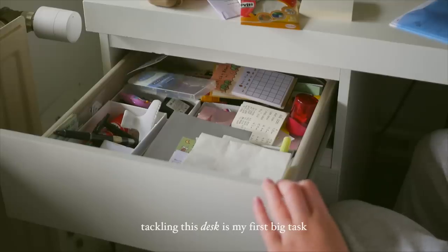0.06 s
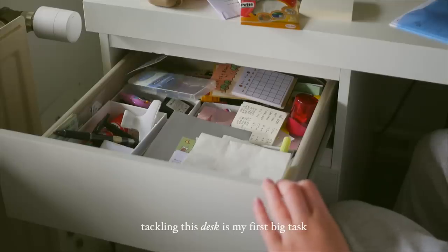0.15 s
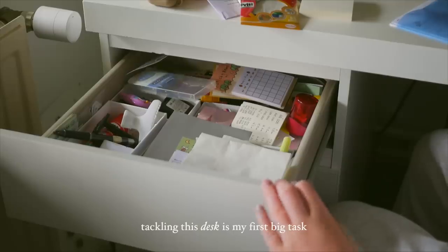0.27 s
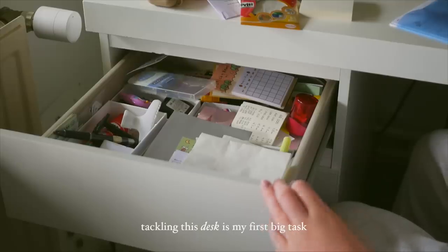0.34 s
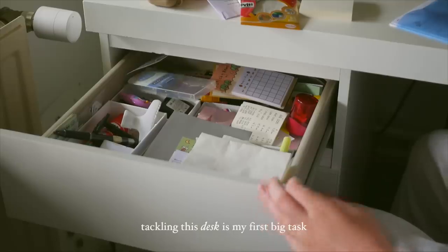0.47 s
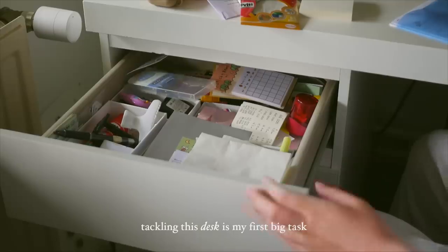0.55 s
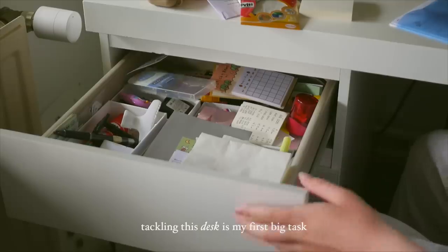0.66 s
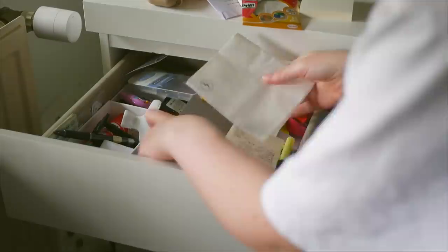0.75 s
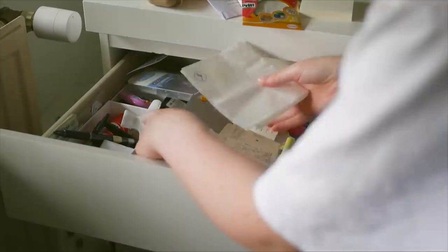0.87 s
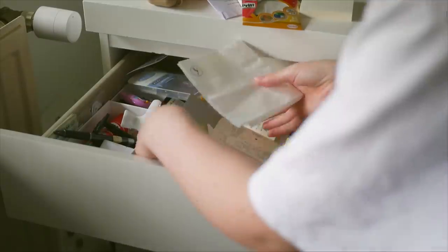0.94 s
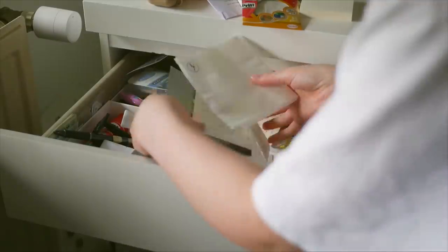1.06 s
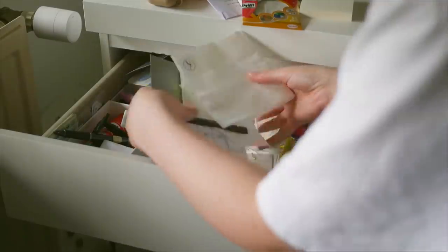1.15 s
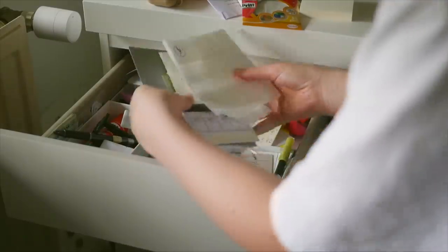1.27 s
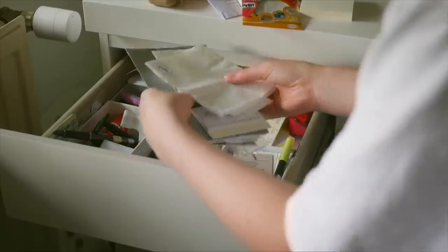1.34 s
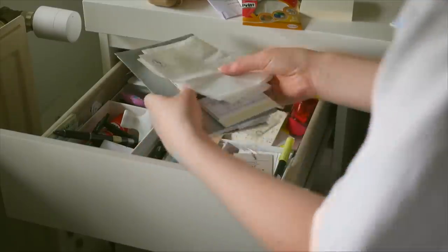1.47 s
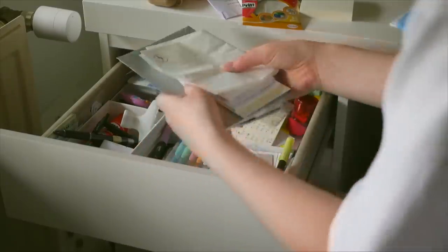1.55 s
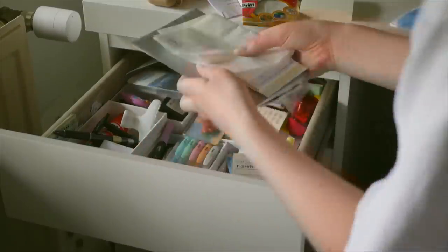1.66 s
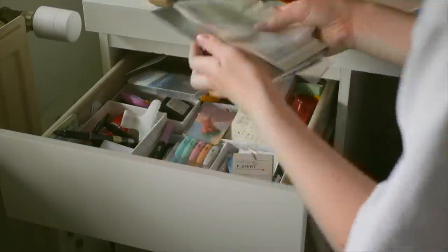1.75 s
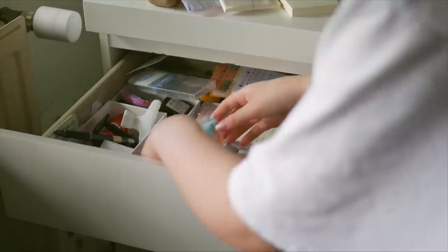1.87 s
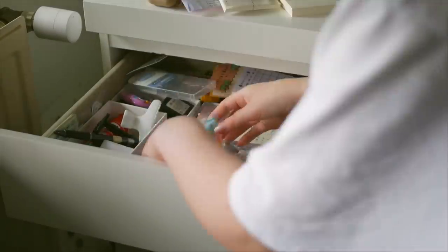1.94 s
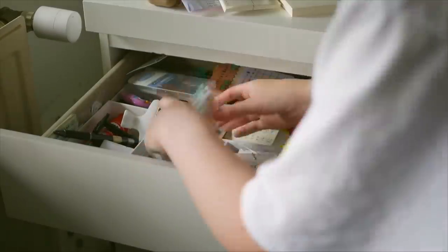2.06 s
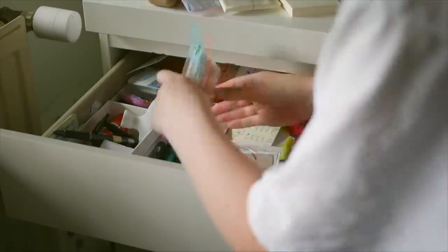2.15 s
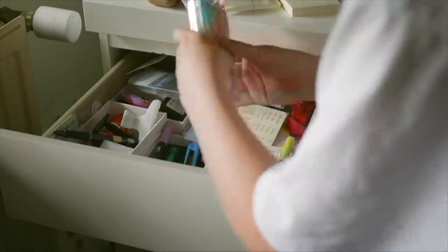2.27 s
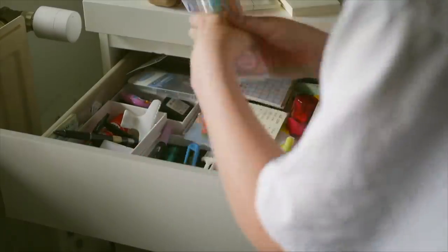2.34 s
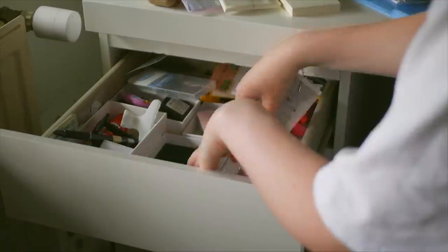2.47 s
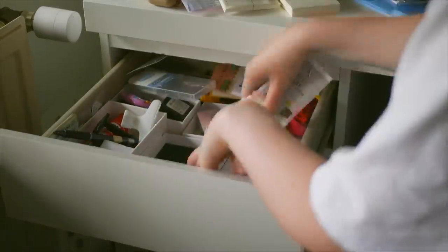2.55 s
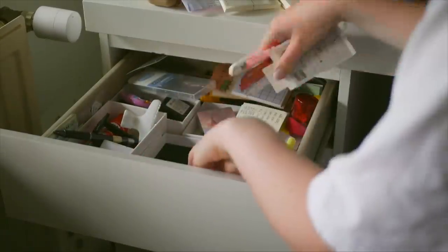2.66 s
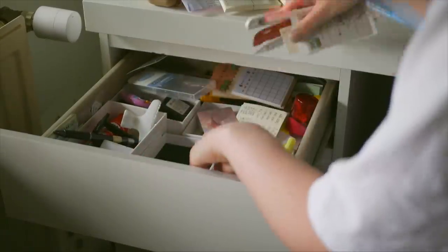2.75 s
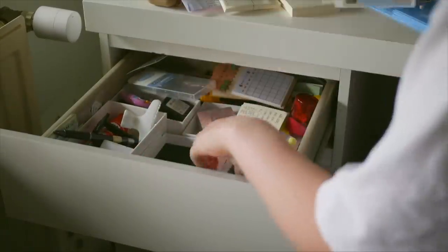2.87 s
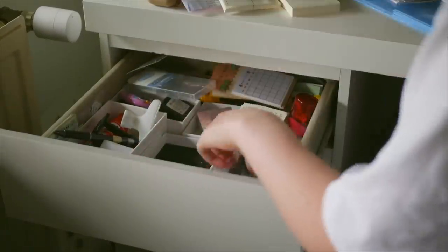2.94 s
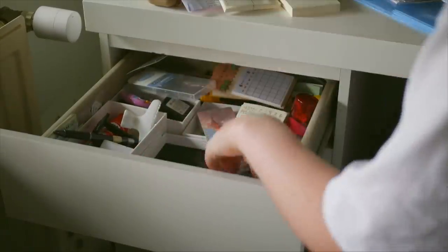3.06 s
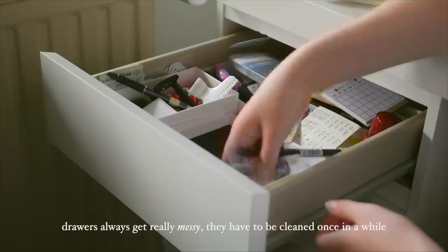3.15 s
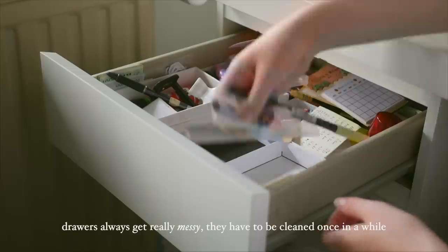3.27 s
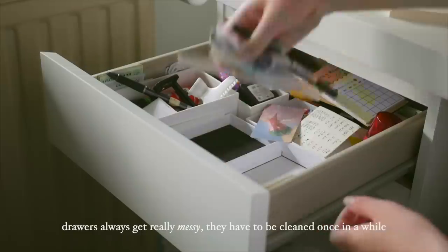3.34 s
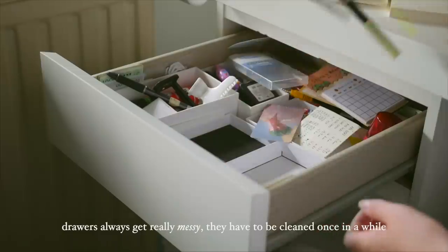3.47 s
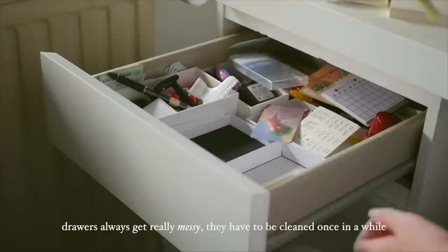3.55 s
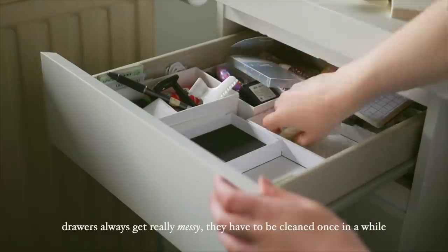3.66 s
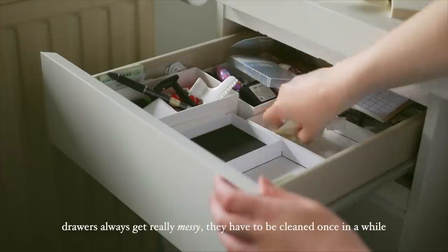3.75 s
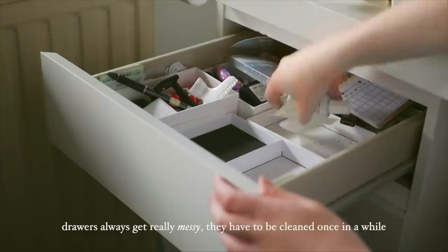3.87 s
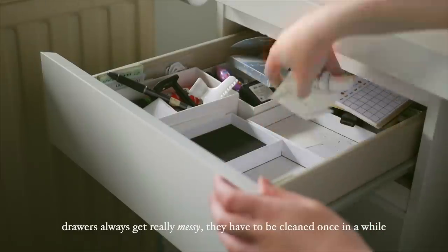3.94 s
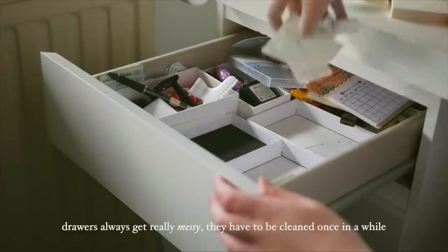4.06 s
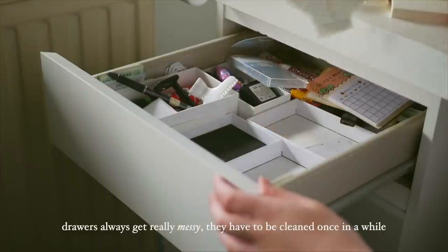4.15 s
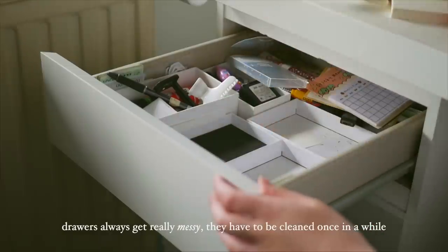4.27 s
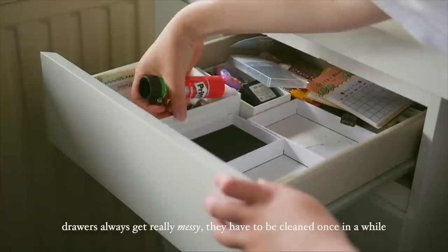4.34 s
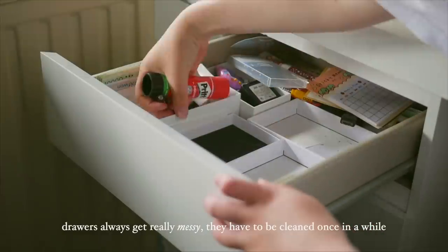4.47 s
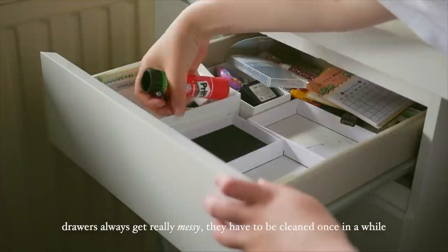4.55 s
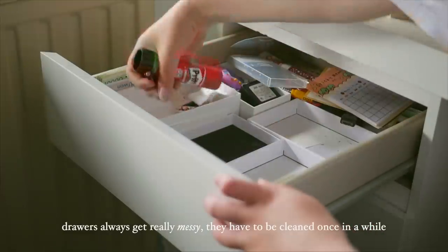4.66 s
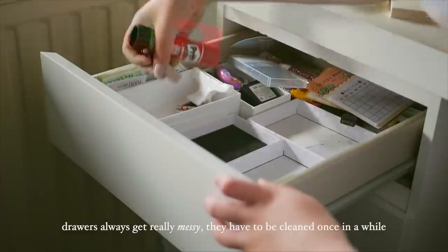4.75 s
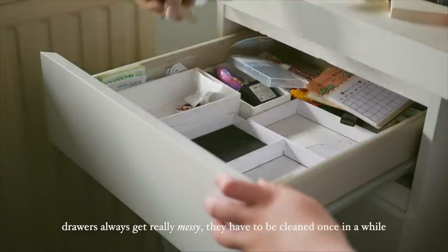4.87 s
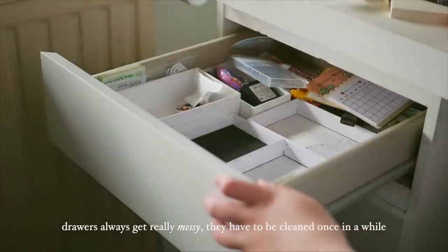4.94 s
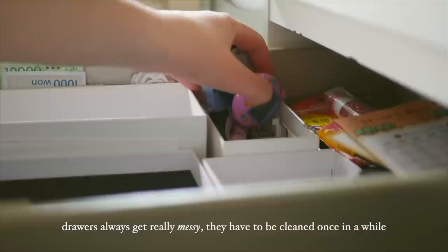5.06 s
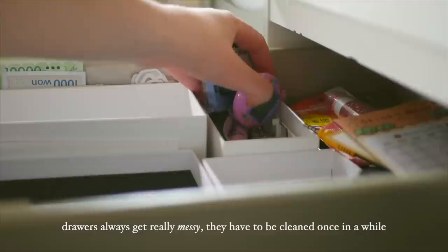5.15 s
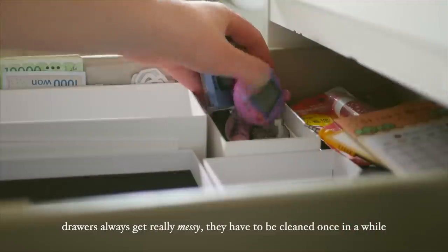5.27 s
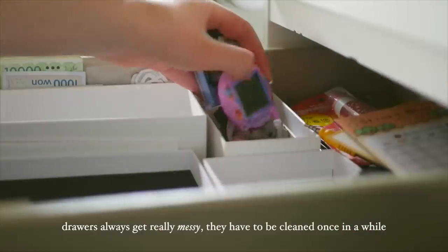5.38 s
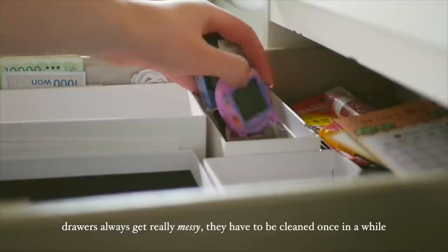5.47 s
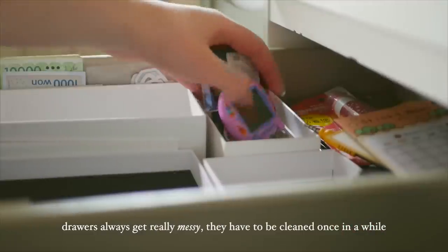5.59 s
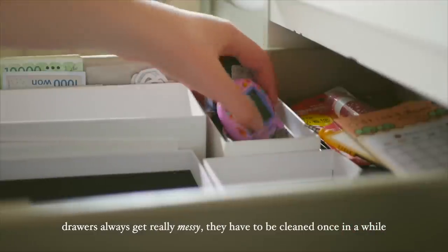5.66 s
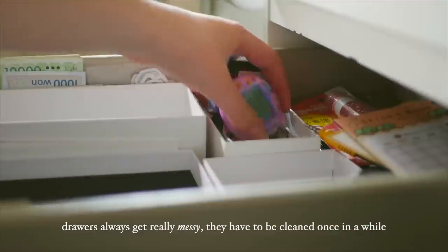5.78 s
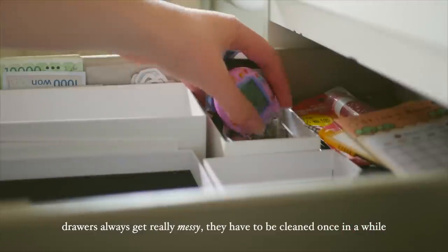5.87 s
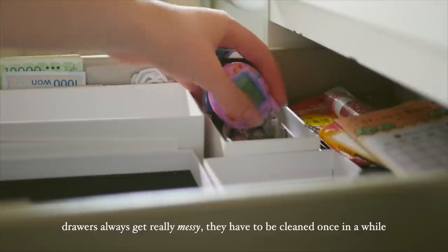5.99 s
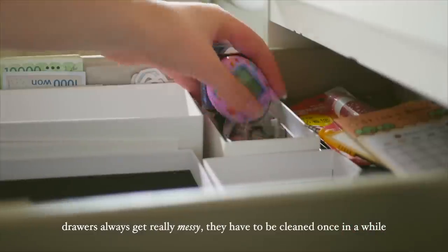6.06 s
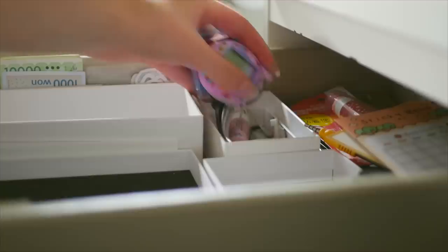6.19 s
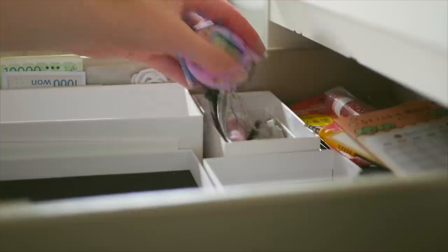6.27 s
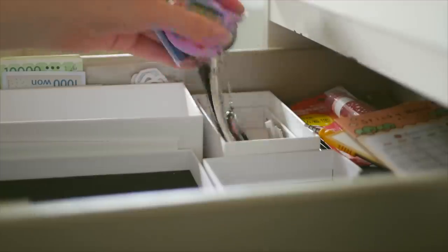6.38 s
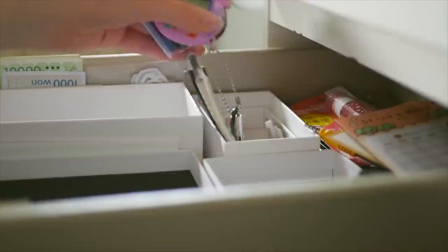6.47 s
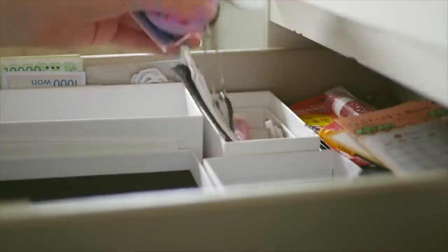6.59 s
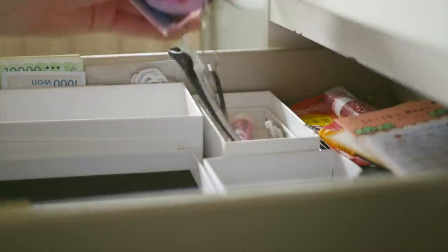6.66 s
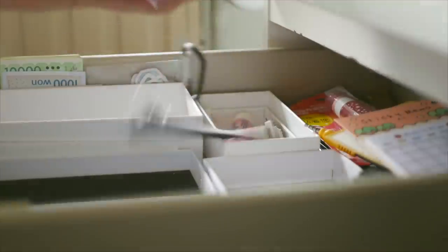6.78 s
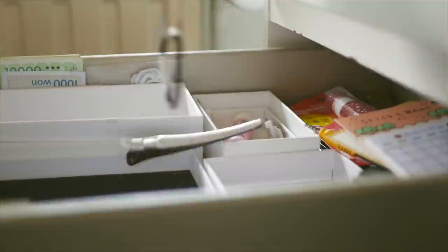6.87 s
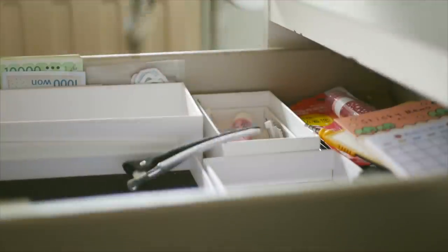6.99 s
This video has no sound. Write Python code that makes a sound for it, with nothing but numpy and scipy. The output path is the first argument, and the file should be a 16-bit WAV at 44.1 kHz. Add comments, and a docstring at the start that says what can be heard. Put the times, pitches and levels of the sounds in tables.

```python
"""Hands sort small things in a desk drawer in a small room, heard at first from a step away.
Faint rubbing opens; papers and sleeves rustle out, small cases are picked from cardboard trays, and at
4.4 s things land on the desk top. From 5 s, heard close, a toy is worked loose and a hair clasp drops.
Filtered noise bursts make the knocks, clumped slips the rubbing, decaying modes the jingles, bent tones
the snaps, driven resonances the scrapes; short tones jostle and a steady low noise is the room's air."""
import sys
import numpy as np
from scipy import signal
from scipy.fft import rfft, irfft, next_fast_len
from scipy.io import wavfile
from scipy.ndimage import uniform_filter1d

SR = 44100
rng = np.random.default_rng(int(sys.argv[2]) if len(sys.argv) > 2 else 0)


def put_to_file(sound):
    """Save the sound as 16-bit audio at rate SR, in the file named by the first command-line argument."""
    columns = np.atleast_2d(sound).T  # one column per channel
    safe = np.clip(columns, -1, 1)
    whole_steps = np.round(safe * 32767)
    wavfile.write(sys.argv[1], SR, whole_steps.astype(np.int16))


N = 309570  # length [samples]
CLOSE_S = 5  # from here on the listener is beside the drawer

# Knocks: papers and sleeves laid on the desk, cases picked from trays (2 s), things landing on the
# desk top (4.4 s), a plastic toy worked loose (5 s), a hair clasp dragged up, dangling, dropping (6.2 s):
# (time [s], contact, strength [dB], brightness [dB per octave], main resonance of the struck thing [Hz])
KNOCKS = [ (.741, "tick", -12.5, -2, 7210), (.818, "crackle", -11.5, -6.5, 1880),
          (1.034, "hollow", -13.5, 8, 1690), (1.115, "flap", -2.5, -0.5, 885),
          (1.612, "crackle", -8.5, 5, 4500), (1.698, "hollow", -5, 4, 1250), (1.7637, "clack", 5, 2, 2380),
          (1.822, "tap", 4, 4.5, 920), (1.8335, "chink", 3.5, 1, 5460), (1.841, "tick", 3.5, -1.5, 5450),
          (1.8864, "clack", 4, -0.5, 1350), (1.905, "thud", 4, 1, 243), (1.983, "hollow", 1.5, 3.5, 1420),
          (2.009, "tick", -4, -2.5, 630), (2.152, "thud", 6.5, -2, 256), (2.168, "chink", -9, -3, 8900),
          (2.178, "thud", 5.5, 0, 300), (2.276, "knock", 0, 0, 364), (2.359, "pop", -11, 6, 3080),
          (2.4224, "clack", -9, 1, 10800), (2.803, "pop", 0, 8, 3540), (2.853, "tap", 2.5, 1, 620),
          (3.1411, "tap", 1.5, 1, 563), (3.2165, "hollow", 7.5, 2, 1570), (3.272, "hollow", 0, -0.5, 840),
          (3.3682, "crackle", -9.5, 1.5, 10700), (3.702, "knock", -6, 2.5, 1380),
          (3.8038, "hollow", 1, -1.5, 1370), (3.8445, "snap", -5, -1.5, 1430),
          (4.2044, "knock", -13, 0.5, 530), (4.3812, "hollow", 17.5, 1.5, 890),
          (4.4, "bounce", 22, -0.5, 574), (4.409, "bounce", 9, 2.5, 900), (4.4463, "chink", 13, -2, 7700),
          (4.4545, "knock", 15, -0.5, 603), (4.4734, "bounce", 19, 2, 637), (4.5712, "snap", 0, -3.5, 2700),
          (4.5805, "crackle", -0.5, -1.5, 4140), (4.778, "knock", -5, 0, 264), (5.021, "tap", 2.5, 0, 764),
          (5.0312, "hollow", 8.5, -.5, 1050), (5.0448, "pop", 10, -1, 1750),
          (5.073, "hollow", 2.5, 0.5, 1230), (5.264, "thud", 9, -1.5, 215), (5.3056, "snap", 13, -1, 6800),
          (5.312, "clack", 6.5, -0.5, 3220), (5.3165, "hollow", 5.5, 0, 1220),
          (5.3729, "snap", -5, -1, 800), (5.39, "pop", -1, -1, 1880), (5.401, "snap", -4.5, 0.5, 2290),
          (5.4288, "pop", 5.5, -3.5, 1900), (5.4305, "bounce", 4.5, -2, 490), (5.464, "pop", 0.5, -3, 1900),
          (5.476, "clack", -5, -0.5, 5100), (5.484, "clack", 4, -3, 1030), (5.599, "bounce", 6, -3, 320),
          (5.651, "crackle", -8.5, -2.5, 2180), (5.73, "knock", 6, -1.6, 1350), (5.813, "pop", 3, -1, 2380),
          (5.8361, "snap", 8, -1.5, 6240), (5.84, "tick", 5.5, -1, 6070), (5.884, "snap", 6.5, -1.5, 6960),
          (5.8912, "snap", 6.5, -1, 544), (6.2214, "chink", -8, -0.5, 7040),
          (6.427, "clack", 6.5, -0.5, 3300), (6.429, "clack", 11, 0.5, 4230),
          (6.4635, "snap", 6, -1.5, 3280), (6.464, "tap", 12, 1, 584), (6.5714, "snap", 2.5, -2.5, 1950),
          (6.607, "snap", 1.5, -2.5, 1190), (6.6618, "snap", -2, -1, 2270), (6.794, "tap", 7.5, -1.5, 553),
          (6.8586, "thud", 27.5, -0.96, 296), (6.958, "thud", 7.5, -3, 730)]
# Centres of the bands in which a contact is coloured: (frequency [Hz])
KNOCK_BANDS_HZ = [240, 720, 2000, 4900, 10500]
# Kinds of contact. thud: something blunt on the drawer's bottom; tap: on a cardboard tray; hollow: a light
# case; knock: hard plastic on tray or desk; clack: plastic on plastic; bounce: a flat face slaps the desk;
# snap: an edge catches and lets go; pop: a small shell slips off an edge; tick: a thin hard edge;
# chink: small metal parts touch; crackle: a sleeve buckles or a thin edge slips; flap: a stiff card flexes.
# (level in each knock band [dB], ring t60 before the room draws it out or in [s],
#  lift of the main resonance [dB], extra room [dB], first push against the ring [ratio])
CONTACTS = { "thud": ((0.5, -14.5, -18.5, -29, -41.5), 0.043, 9.6, 0, 0.33),
            "tap": ((0, -0.5, -13.5, -19.5, -30), 0.057, 8.6, -0.76, 0.4),
            "hollow": ((-15.5, 0, -5, -21, -30.5), 0.052, 9.6, 0, 0.23),
            "knock": ((0, -1.5, -7.5, -10.5, -21.5), 0.045, 11.5, 0, 0.57),
            "clack": ((-7, -5, -1, -5, -13.5), 0.049, 8.6, -0.31, 0.25),
            "bounce": ((0, -4, -19.5, -17.5, -34), 0.013, 7.6, -1, 0.85), "snap": ((-11, -3, -4, -4, -10.5),
            0.03, 8.5, -1.5, 0.63), "pop": ((-2, -15, 0.5, -16, -35.5), 0.041, 5.2, -2, 0.26),
            "tick": ((3, -6.5, -7.5, -1.5, -1), 0.096, 6.46, -0.4, 0.19),
            "chink": ((-13, -7, -42, -0.5, -6), 0.03, 10.8, -2, 0.46),
            "crackle": ((-11.5, -7, -3, -7, -18.5), 0.017, 8, -4, 0.52),
            "flap": ((-17, -2.5, -19, -26, -17), 0.074, 10.6, 0.86, 0.22), }
FAR_ROOM_DB, CLOSE_ROOM_DB = 1.5, -4.5  # the room against a knock's direct sound, before the contact's extra
PIVOT_HZ = 2000  # brightness tilts a knock's spectrum about this point

# Strokes of the hand: (start [s], length [s], movement, effort [dB])
STROKES = [ (0, 0.32, "drag", -55), (0, 0.72, "rummage", -66.5), (0.714, 0.34, "leaf", -49),
           (0.787, 0.098, "slide", -45.5), (1.015, .18, "slide", -65), (0.734, 0.13, "swish", -42.5),
           (1.06, 0.42, "leaf", -52), (1.321, .1, "swish", -39), (1.492, 0.14, "swish", -39),
           (1.668, 0.23, "leaf", -43), (1.765, 0.045, "leaf", -38), (1.86, .08, "drag", -47),
           (1.977, 0.072, "leaf", -40.5), (2.008, 0.15, "drag", -44.5), (2.142, .18, "drag", -40),
           (2.244, 0.14, "shift", -47.5), (2.353, 0.55, "leaf", -51.5), (2.78, 0.045, "swish", -47),
           (2.814, 0.4, "shift", -52), (3.098, 0.13, "leaf", -43.5), (3.23, 0.039, "drag", -42.5),
           (3.723, 0.16, "swish", -46.5), (3.79, 0.03, "swish", -38), (3.755, .075, "shift", -39),
           (4.414, 0.065, "shift", -25.5), (4.596, 0.35, "rummage", -58.5), (5.008, 0.07, "rummage", -42),
           (5.098, 0.27, "rummage", -46.5), (5.218, 0.77, "rummage", -47), (5.218, .08, "leaf", -44),
           (5.285, 0.13, "shift", -45), (5.43, 0.25, "shift", -46.5), (5.775, 0.059, "shift", -31.5),
           (5.987, 0.65, "rummage", -50), (6.21, 0.23, "drag", -49), (6.364, 0.097, "rummage", -36),
           (6.573, 0.39, "rummage", -51.5), (6.852, 0.044, "drag", -42)]
# Hand movements. leaf: through papers and sleeves; swish: a sleeve slides out; slide: card over card;
# shift: packets pushed aside; drag: something heavier along a tray; rummage: fingers among trinkets.
# (rubbing on trays [dB], sliding card [dB], crinkling sleeves [dB], rise [s], sag [dB per s], release [dB per s])
MOVES = { "leaf": (-2, -2, 0.5, 0.2, 1, 147), "swish": (-22, -13.5, 0.5, 0.07, 11, 174),
         "slide": (-20, -1.5, -16, 0.2, 14, 150), "shift": (0.5, -0.5, -2, 0.22, 4.5, 174),
         "drag": (-0.5, -20, -18, 0.1, 7, 156), "rummage": (-1, -0.5, -15.5, 0.12, 1, 123), }
# Colour of hands rubbing on trays: (frequency [Hz], density [dB per Hz])
RUB = [(70, -31.5), (130, -10), (270, 2.5), (480, -8), (800, -15.5), (2000, -61)]
# Colour of card sliding on card: (frequency [Hz], density [dB per Hz])
SLIDE = [(300, -13), (650, 4.5), (950, 1.5), (1400, 0), (2600, -7.5), (4500, -34), (11000, -46)]
# Colour of thin sleeves crinkling: (frequency [Hz], density [dB per Hz])
CRINKLE = [(1200, -11), (3000, -2), (5000, 0.5), (7200, -1), (10500, -5), (13000, -15.5), (15500, -25)]
# Hollow resonances of the open drawer and its trays, and one dip: (centre [Hz], width [Hz], lift [dB])
DRAWER = [(127, 16, 4), (158, 36, -5), (277, 40, 3), (443, 14, 2.5), (527, 18, 3), (631, 24, 1.5),
          (690, 16, 3), (740, 24, 2)]

# A stiff edge slips off and snaps back, its pitch settling as it seats:
# (time [s], pitch [Hz], level [dB], octave overtone [dB], starting pitch offset [share of the pitch])
SNAPS = [(4.461, 4420, -8, -20, -0.04), (5.0315, 4300, -14.5, -20, -0.057),
         (5.0444, 2600, -6.5, -27, -0.28), (5.4287, 2900, -17, -20, -0.25),
         (5.5857, 2470, -2.5, -15, -0.47), (6.4291, 2090, 5, 4, 0.44), (6.4383, 2170, -4, -12, -0.37)]
SNAP_RISE_S, SNAP_T60_S, SNAP_SETTLE_S = .0014, 0.0065, 0.00062

# Blows that set things ringing: (time [s], thing, level [dB])
RINGS = [(2.008, "pins", -40.5), (2.173, "pins", -40.5), (2.4228, "ring", -43), (2.471, "ring", -43),
         (2.53, "ring", -43.5), (2.985, "ring", -55), (3.2164, "case", -31.5), (4.3811, "desk", -42),
         (4.4, "desk", -31), (4.4474, "pen", -32.5), (4.473, "desk", -36.5), (6.432, "clasp", -34),
         (6.859, "desk", -36.5)]
# Modes each thing rings with: (frequency [Hz], level [dB], t60 [s])
MODES = { "desk": [(296, -20, 0.18), (458, 2, 0.53), (530, 7.5, 0.25), (582, -1.5, 0.47), (667, 3, 0.43),
         (893, 0.5, 0.17), (1183, -1.5, 0.44)], "case": [(840, -3, 0.25), (875, 2, 0.26), (1546, 1, 0.36),
         (1640, 1.5, 0.16), (1680, -16, 0.21), (2255, -9.5, 0.36)], "clasp": [(2015, -1, 0.14),
         (2120, -3, 0.162), (2270, 8, 0.19), (2600, 3, .26), (2800, -10, 0.24), (3350, 3, 0.205),
         (4080, 6, 0.31), (4350, 3, 0.3), (4480, -3.5, 0.25), (4850, -8, .2)], "pen": [(2388, 1.5, .4),
         (2680, -3, 0.61), (4080, 4, 0.23), (4720, -4, 0.57), (5500, -8, 0.44), (6770, -3, 0.25),
         (8250, -7, 0.27), (8080, 2, 0.33)], "pins": [(5730, -4.5, 0.21), (7040, -1, 0.27), (8800, -5, 0.2),
         (8950, -8, 0.21), (10400, -3, 0.17), (12300, -9, 0.25), (14740, -9, .12)],
         "ring": [(7160, -6, 0.22), (9650, -10, .25), (10830, -6, 0.19), (10850, -4, 0.28)], }
# A held or loose thing chatters against its neighbours as it rings: (share of the ring [0-1], width [Hz])
CHATTER = {"desk": (.3, 25), "case": (.35, 45), "clasp": (.92, 280), "pen": (.9, 150), "pins": (.8, 190),
           "ring": (.85, 240)}

# An edge scrapes along a tray or packet and makes it sing: (start [s], length [s], resonance [Hz], level [dB])
SCRAPES = [(.85, 0.063, 690, -50), (1.513, 0.13, 2973, -49.5), (1.557, .09, 1370, -57.5),
           (2.613, 0.2, 3230, -58), (3.803, 0.043, 454, -44), (5.274, 0.046, 3260, -44.5),
           (5.319, 0.17, 830, -42), (6.703, 0.11, 2420, -54)]

# Colour of the room's own air: (frequency [Hz], density [dB per Hz])
AIR = [(30, -29), (65, -25), (95, -3.5), (170, -5.5), (280, -4.5), (480, -7), (1100, -13), (3000, -22),
       (15000, -38)]
AIR_DB = -53.5
# Dying away of the room, before a closing fade: (frequency [Hz], t60 [s])
ROOM = [(120, 0.36), (400, 0.28), (1000, 0.41), (2800, 0.29), (7300, 0.3), (15000, 0.12)]
# How alike diffuse sound is at left and right, for a spread of 1: (frequency [Hz], likeness [0-1])
DIFFUSE = [(50, 0.93), (170, 0.97), (650, 0.84), (1300, 0.76), (2800, 0.97), (6000, 1)]
# Level difference of the two microphones: (frequency [Hz], left minus right [dB])
BALANCE = [(60, -1.5), (140, -2.4), (320, -1.2), (700, .4), (1400, 1.9), (2800, .6), (5000, 0)]
# Phase difference of the two microphones: (frequency [Hz], lead of the left [rad])
LEAD = [(60, 0.046), (600, 0.27), (1400, 0.64), (3000, 0.033)]
EDGE_HZ = 15600  # upper band limit


def knocks(bass_db=-22, top_db=-12, note_width=0.18, size=4096, count=16):
    """Each contact sets a light thing ringing briefly around its main resonance; the room answers."""
    out = np.zeros((2, N))
    t, hz = np.arange(size) / SR, abs(np.fft.fftfreq(size, 1 / SR))
    spots = [room() for _ in range(count)]
    octaves = np.log2(np.array(KNOCK_BANDS_HZ) / PIVOT_HZ)
    for k, (s, contact, blow_db, brightness, note_hz) in enumerate(KNOCKS):
        colour_db, ring_s, note_db, extra_room_db, first_push = CONTACTS[contact]
        band_db = blow_db + np.array(colour_db) + brightness * octaves
        room_db = extra_room_db + (FAR_ROOM_DB if s < CLOSE_S else CLOSE_ROOM_DB)
        # from further away, reflections off the desk draw the ring out
        t60 = ring_s * amp(.5 * room_db)
        attack = 1 - np.exp(-t / 0.00006)
        ring = unit(rng.standard_normal(size) * amp(-60 * t / t60) * attack)
        ring[0] += first_push
        sound = amp(room_db) * spots[k % count]
        add(sound, 0, whiten(ring, 800))
        low, high = band_db[0], band_db[-1]
        bass = [(30, low - 40), (80, low + bass_db), (160, low - 7)]
        spectrum = [*bass, *zip(KNOCK_BANDS_HZ, band_db), (15500, high + top_db)]
        note = note_db * bump(hz, note_hz, note_width * note_hz)
        click = causal(read(spectrum, hz) + note)
        add(out, s, signal.fftconvolve(sound, click[None], axes=1))
    return out


def handling():
    """Hands rub along the trays, card slides on card, thin sleeves crinkle."""
    rubbing = friction(order=0, spectrum=RUB, per_s=200, spread_db=3.0, smooth=1.0, clump_db=2.5, room_db=10.0)
    sliding = friction(order=1, spectrum=SLIDE, per_s=450, spread_db=2.5, smooth=0.83, clump_db=3, room_db=7.0)
    crinkling = friction(order=2, spectrum=CRINKLE, per_s=1500, spread_db=2.5, smooth=1.0, clump_db=2.5,
                         room_db=-3.5)
    return rubbing + sliding + crinkling


def friction(order, spectrum, per_s, spread_db, smooth, clump_db, room_db, close_bass_db=9):
    """Tiny slips come in clumps over a smooth hiss of sliding; close up they are sparser, drier and deeper."""
    effort, t = strokes(order), np.arange(N) / SR
    far, close = (per_s, room_db, 0), (.25 * per_s, room_db - 4.0, close_bass_db)
    heard = []
    for density, wet_db, bass_db in (far, close):
        draw, slip_size = rng.random(N), rng.exponential(1, N)
        hiss, clumps = rng.standard_normal((2, N))
        clumps = uniform_filter1d(uniform_filter1d(clumps, 600), 400)
        clumps = unit(clumps) * np.sqrt(N)
        slips = (draw < density / SR) * amp(spread_db * np.minimum(slip_size, 3))
        # each slip is a tiny burst whose power dies with a 0.49 ms time constant
        power = signal.lfilter([1], [1, -np.exp(-1 / (0.00049 * SR))], slips ** 2)
        bursts = hiss * np.sqrt(power)
        drive = unit(bursts) + smooth * unit(rng.standard_normal(N))
        drive = drive * amp(clump_db * clumps)
        wet = signal.oaconvolve(drive[None], room_path(wet_db), axes=1)[:, :N]
        shape = [(hz, db + bass_db / (1 + (hz / 100) ** 4)) for hz, db in spectrum]
        heard.append(unit(colour(wet, shape)))
    return effort * np.where(t < CLOSE_S, *heard) * np.sqrt(N)


def strokes(order):
    """How strongly the hands drive one kind of friction: each stroke rises, sags slowly and is released."""
    power, t = np.zeros(N), np.arange(2 * SR) / SR
    for start, length, move, effort_db in STROKES:
        *share_db, rise, sag, release = MOVES[move]
        level_db = effort_db + share_db[order] - sag * t - release * np.maximum(t - length, 0)
        envelope = np.minimum(t / rise, 1) * amp(level_db)
        add(power, start, envelope ** 2)
    return np.sqrt(power)


def drawer(x):
    """The open drawer rings along with whatever moves in it."""
    hz = abs(np.fft.fftfreq(16384, 1 / SR))
    lift_db = sum(db * bump(hz, centre, width) for centre, width, db in DRAWER)
    return signal.fftconvolve(x, causal(lift_db)[None], axes=1)[:, :N]


def snaps(room_db=-9, size=2048):
    """Each snap swells for a few cycles, slides to its pitch and dies at once."""
    out, t = np.zeros(N), np.arange(size) / SR
    shape = (1 - np.exp(-(t / SNAP_RISE_S) ** 2)) * amp(-60 * t / SNAP_T60_S)
    for s, hz, db, overtone_db, bend in SNAPS:
        pitch = hz * (1 + bend * np.exp(-t / SNAP_SETTLE_S))
        phase = 2 * np.pi * np.cumsum(pitch) / SR
        tone = np.sin(phase) + amp(overtone_db) * np.sin(2 * phase)
        add(out, s, amp(db) * shape * tone)
    return nearby(out, room_db)


def rings(room_db=-8):
    """The desk, a case and small metal or plastic things ring on in their own modes after a blow."""
    out = np.zeros((2, N))
    for s, thing, db in RINGS:
        ring = struck(MODES[thing], *CHATTER[thing])
        add(out, s, amp(db) * nearby(ring, room_db))
    # small things radiate no bass
    return signal.sosfilt(signal.butter(3, 220, "high", fs=SR, output="sos"), out)


def struck(modes, share, width_hz, size=22050):
    """Decaying modes of one blow, each disturbed by its own chatter."""
    t, out = np.arange(size) / SR, np.zeros(size)
    for hz, db, t60 in modes:
        wave = np.exp(2j * np.pi * hz * t) * chatter(share, width_hz, size)
        out += amp(db - 60 * t / t60) * wave.imag
    return out


def chatter(share, width_hz, size):
    """A ring's unsteady strength and phase: partly steady, partly scattered into a band."""
    hz = np.fft.fftfreq(size, 1 / SR)
    a, b = rng.standard_normal((2, size))
    scatter = np.fft.ifft((a + 1j * b) * np.exp(-(hz / width_hz) ** 2))
    return np.sqrt(1 - share ** 2) + share * scatter / np.std(scatter)


def scrapes(slips_per_s=220, width=0.37, wander=0.12, room_db=-4):
    """Uneven slips excite a resonance that wanders as the point of contact moves."""
    out = np.zeros(N)
    for start, length, hz, db in SCRAPES:
        t = np.arange(0, length, 1 / SR)
        draw, force = rng.random((2, len(t)))
        swell = np.sin(np.pi * t / length) ** .5
        slips = (draw < slips_per_s / SR) * (.5 + force) * swell
        pitch = hz * (1 + wander * np.sin(2 * np.pi * (t / length + rng.random())))
        turn = np.exp(2j * np.pi * np.cumsum(pitch) / SR)
        # a double-pole resonator turning at the wandering pitch
        r = np.exp(-np.pi * width * hz / SR)
        sound = (turn * signal.lfilter([1], [1, -2 * r, r * r], slips / turn)).real
        add(out, start, amp(db) * unit(sound) * np.sqrt(len(t)))
    return nearby(out, room_db)


def jostle(per_s=130, level_db=18.0, spread_db=2.5, low_hz=750, high_hz=3900, t60=0.0066, room_db=-4, count=24):
    """Trinkets touch each other while the hand moves, each with a brief pitch of its own."""
    t, out = np.arange(2048) / SR, np.zeros(N)
    draw, touch_size = rng.random(N), np.minimum(rng.exponential(1, N), 3)
    which = rng.integers(0, count, N)
    touches = (draw < per_s / SR) * amp(level_db + spread_db * touch_size) * strokes(order=1)
    things = []
    for hz, overtone in zip(np.geomspace(low_hz, high_hz, count), rng.uniform(1.36, 1.72, count)):
        tone = np.sin(2 * np.pi * hz * t) + .5 * np.sin(2 * np.pi * hz * overtone * t)
        things.append(unit(tone * amp(-60 * t / t60)))
    for at in np.flatnonzero(touches):
        add(out, at / SR, touches[at] * things[which[at]])
    # small things radiate no bass
    out = signal.sosfilt(signal.butter(2, 400, "high", fs=SR, output="sos"), out)
    return nearby(out, room_db)


def air():
    """The quiet steady rumble of the room: coloured noise, unlike at left and right."""
    noise = diffuse(next_fast_len(N), spread=16.0)[:, :N]
    return amp(AIR_DB) * unit(colour(noise, AIR)) * np.sqrt(N)


def room(size=24576, onset=0.0055):
    """The room's answer from one spot, each band dying at its own speed."""
    hz, t, z = signal.stft(diffuse(size), SR, nperseg=256)
    decay = amp(-60 * t / read(ROOM, hz)[:, None])
    tail = signal.istft(z * decay, SR, nperseg=256)[1][:, :size]
    build_up = 1 - np.exp(-(np.arange(size) / SR / onset) ** 2)
    return whiten(tail, 440) * build_up


def room_path(room_db):
    """The direct sound together with the room's answer."""
    path = amp(room_db) * room()
    path[:, 0] += 1
    return path


def nearby(x, room_db):
    """A small sound as it arrives directly and by way of the room."""
    return signal.oaconvolve(x[None], room_path(room_db), axes=1)[:, :N]


def diffuse(size, spread=1):
    """Noise as it reaches two nearby microphones; the more spread out its sources, the less alike the two."""
    a, b = rfft(rng.standard_normal((2, size)))
    same = np.clip(read(DIFFUSE, np.fft.rfftfreq(size, 1 / SR)), 0, 1) ** spread
    mid, side = a * np.sqrt(1 + same), b * np.sqrt(1 - same)
    return irfft(np.array([mid + side, mid - side]), size)


def amp(db):
    """Turns dB into an amplitude."""
    return 10 ** (np.asarray(db) / 20)


def unit(x):
    """Scales to an energy of 1 in each channel."""
    return x / np.sqrt(np.sum(x ** 2, -1, keepdims=True) + 1e-20)


def read(points, hz):
    """Joins (frequency [Hz], value) points on a log-frequency axis."""
    f, value = np.transpose(points)
    return np.interp(np.log(hz + 1), np.log(f + 1), value)


def add(mix, s, sound):
    """Mixes a sound in at a time [s], cut off at the end of the mix."""
    part = mix[..., round(s * SR):][..., :sound.shape[-1]]
    part += sound[..., :part.shape[-1]]


def colour(x, points):
    """Filters by a dB spectrum."""
    size = next_fast_len(x.shape[-1])
    gain = amp(read(points, np.fft.rfftfreq(size, 1 / SR)))
    return irfft(rfft(x, size) * gain, size)[..., :x.shape[-1]]


def bump(hz, centre_hz, width_hz):
    """The skirt of a resonance, 1 at its centre."""
    return 1 / (1 + (2 * (hz - centre_hz) / width_hz) ** 2)


def causal(gain_db):
    """The minimum-phase click, its energy as early as can be, with a given dB gain at each FFT bin."""
    spectrum = np.exp(signal.hilbert(np.log(amp(gain_db))).conj())
    return np.fft.ifft(spectrum).real[:len(gain_db) // 2]


def whiten(x, width_hz):
    """Keeps the fine resonances of a dying sound, evens out its broad colour and fades its second half."""
    size, z = x.shape[-1], rfft(x)
    power = uniform_filter1d(abs(z) ** 2, max(3, int(width_hz * size / SR)), axis=-1)
    fade = np.minimum(np.linspace(2, 0, size), 1) ** 2
    return unit(irfft(z / np.sqrt(abs(power) + 1e-12), size) * fade)


def scene():
    """Knocks and handling sound through the drawer; the other sources and the room's air join them."""
    in_drawer = drawer(knocks() + handling())
    return in_drawer + snaps() + scrapes() + rings() + air() + jostle()


def record(dry, notch_hz=7800, notch_width_hz=80, notch_depth=1.0):
    """The two microphones differ a little and share a narrow notch; then the band limit."""
    size = next_fast_len(N + 4096)
    hz = np.fft.rfftfreq(size, 1 / SR)
    notch = 1 - notch_depth * np.exp(-((hz - notch_hz) / notch_width_hz) ** 2)
    side = np.array([[.5], [-.5]])  # half of each difference to the left, half to the right
    ports = amp(side * read(BALANCE, hz)) * np.exp(1j * side * read(LEAD, hz))
    heard = irfft(rfft(dry, size) * notch * ports, size)[:, :N]
    low_pass = signal.firwin(255, EDGE_HZ, window=("kaiser", 9), fs=SR)
    return signal.oaconvolve(heard, low_pass[None], "same")


dry = scene()
out = record(dry)
put_to_file(out)
```